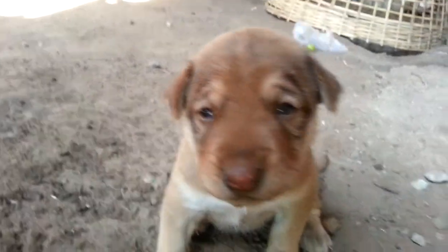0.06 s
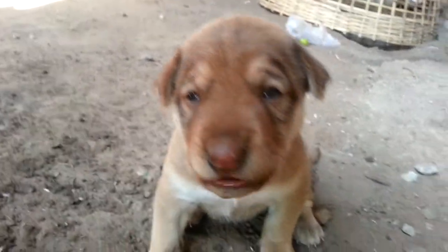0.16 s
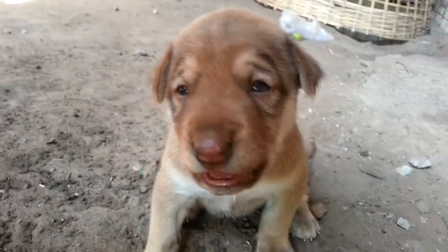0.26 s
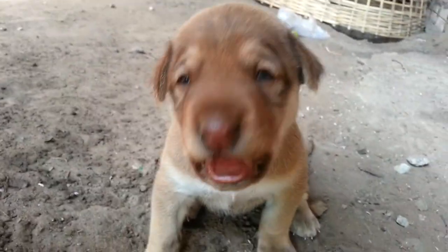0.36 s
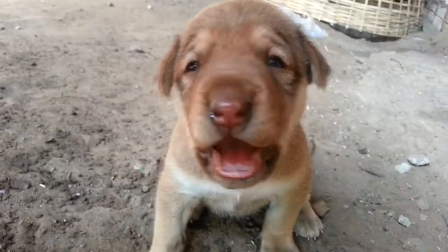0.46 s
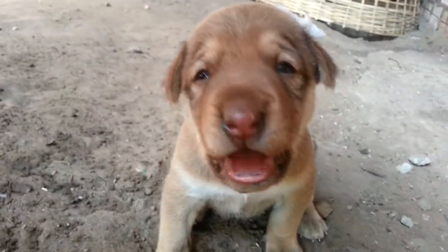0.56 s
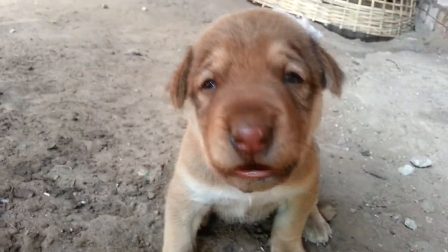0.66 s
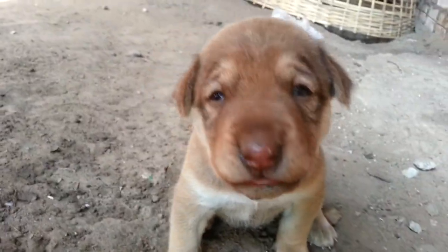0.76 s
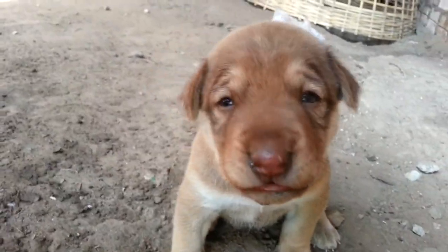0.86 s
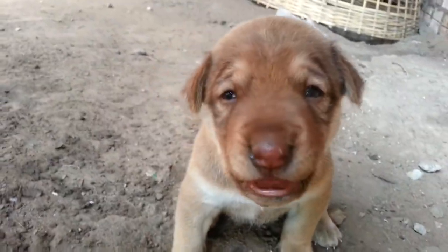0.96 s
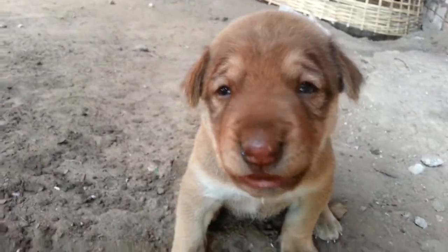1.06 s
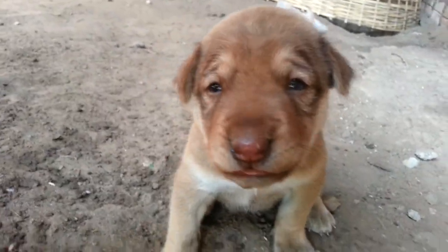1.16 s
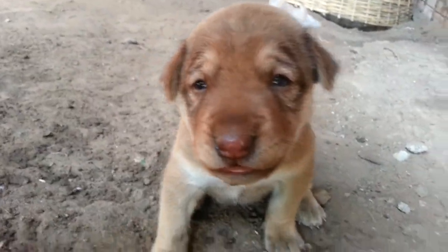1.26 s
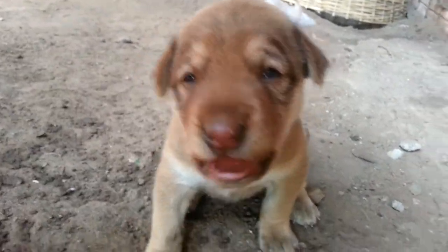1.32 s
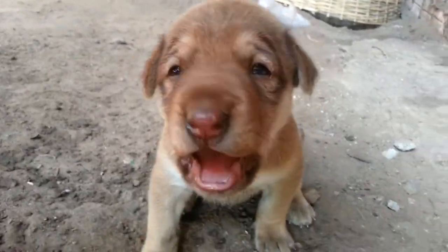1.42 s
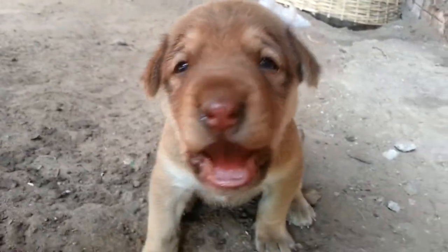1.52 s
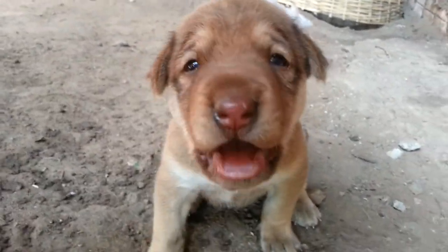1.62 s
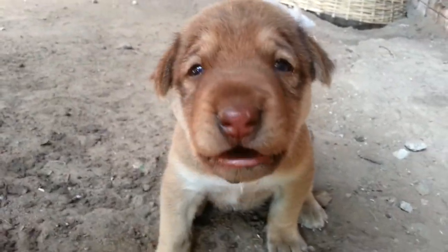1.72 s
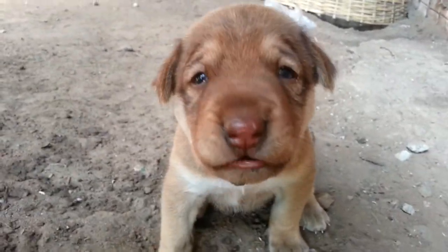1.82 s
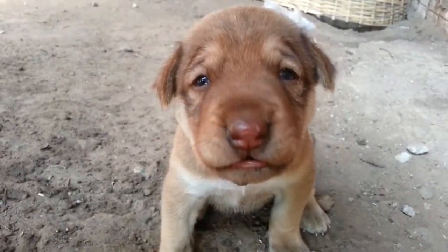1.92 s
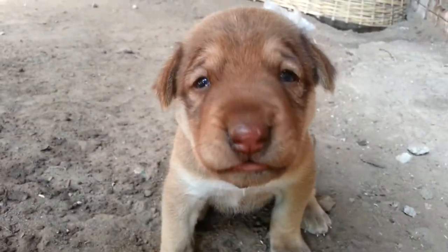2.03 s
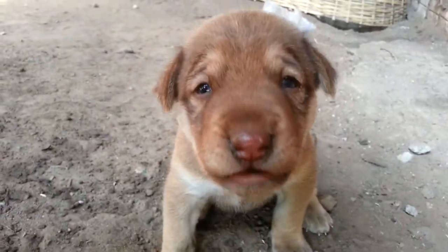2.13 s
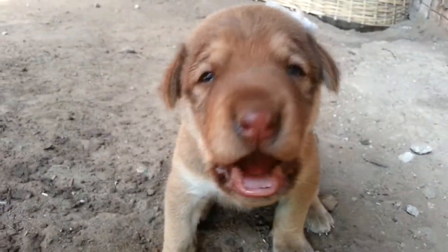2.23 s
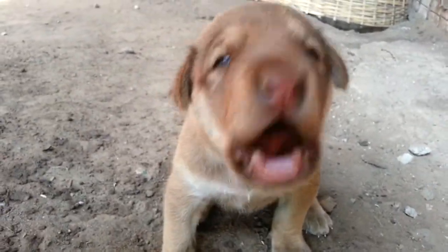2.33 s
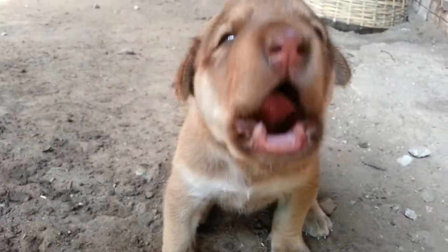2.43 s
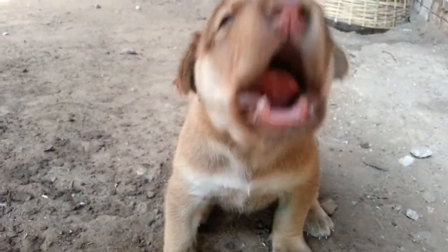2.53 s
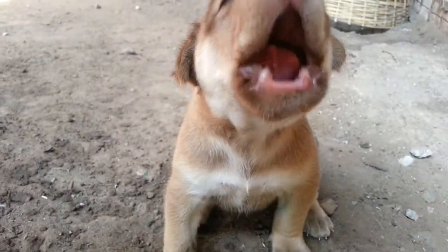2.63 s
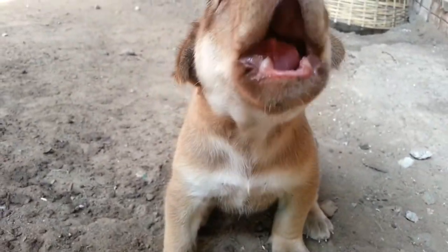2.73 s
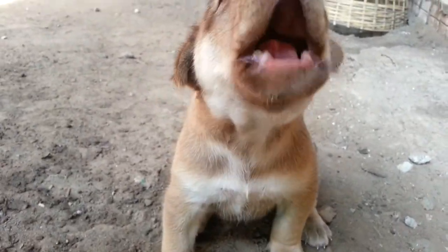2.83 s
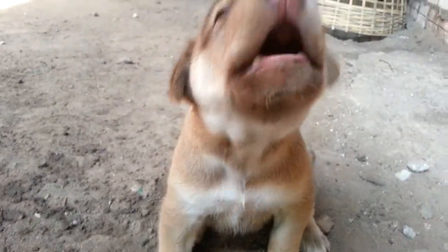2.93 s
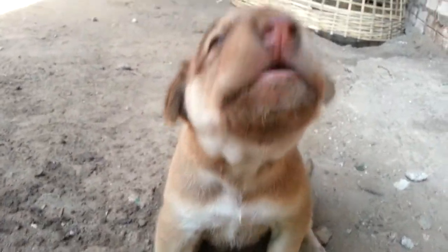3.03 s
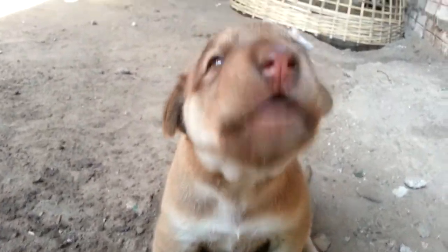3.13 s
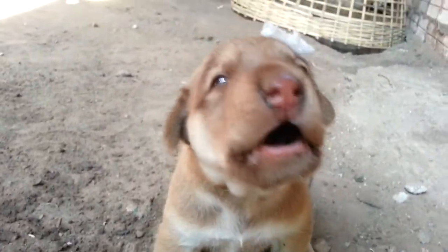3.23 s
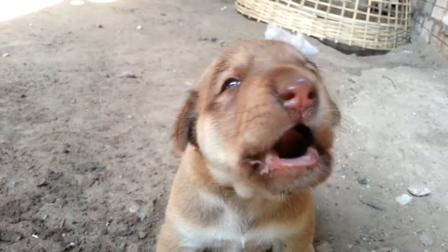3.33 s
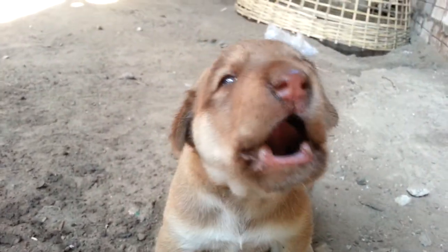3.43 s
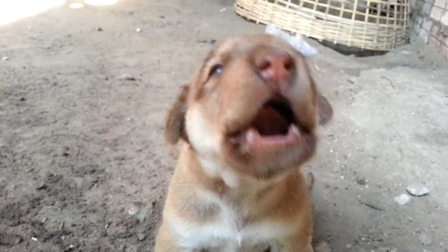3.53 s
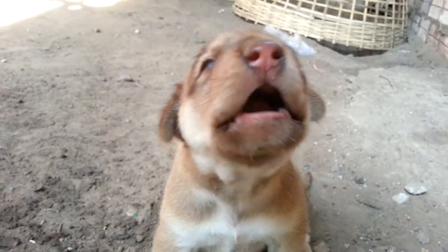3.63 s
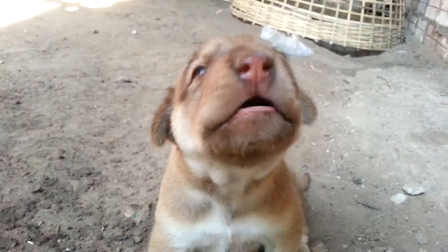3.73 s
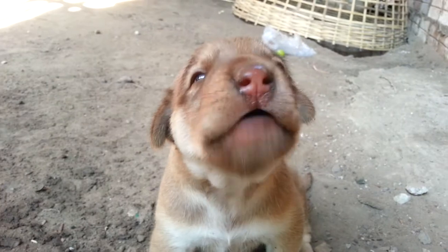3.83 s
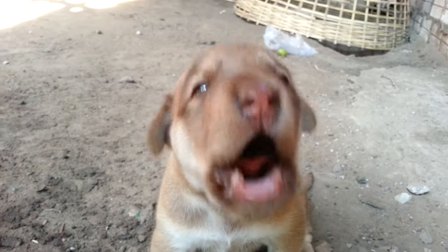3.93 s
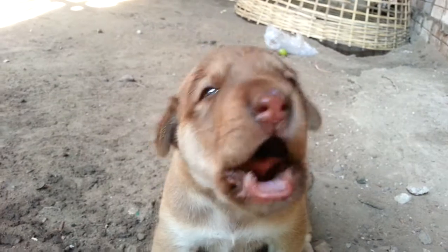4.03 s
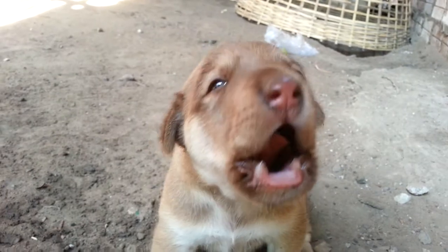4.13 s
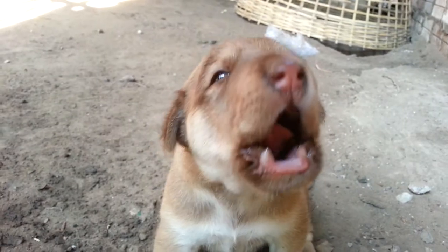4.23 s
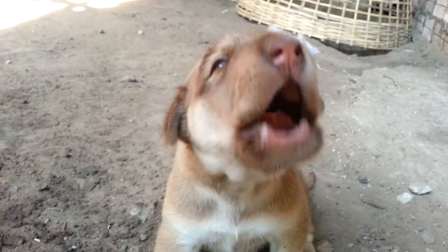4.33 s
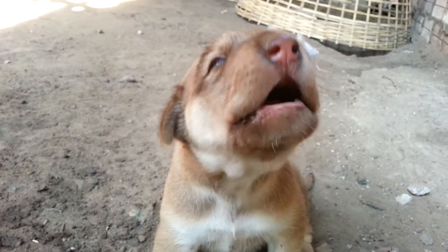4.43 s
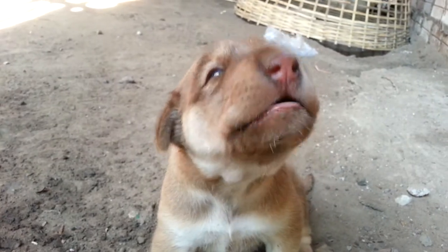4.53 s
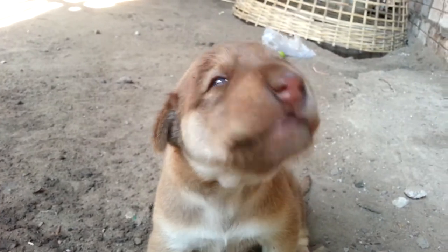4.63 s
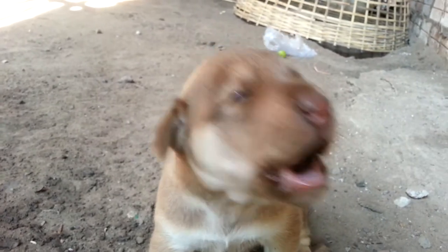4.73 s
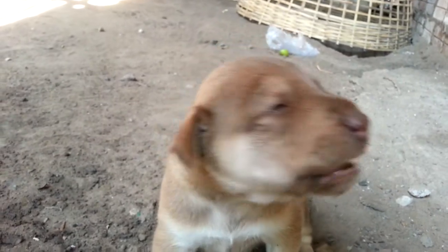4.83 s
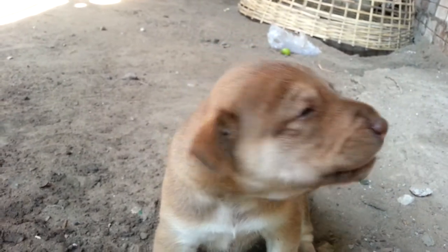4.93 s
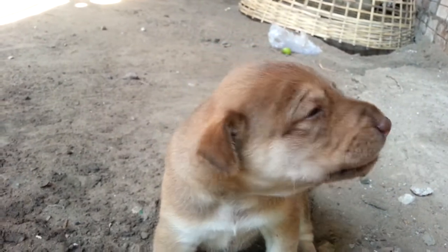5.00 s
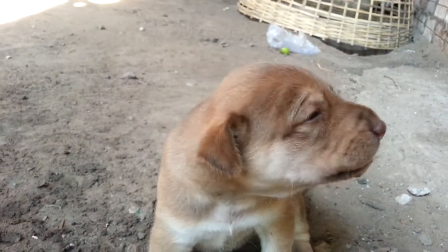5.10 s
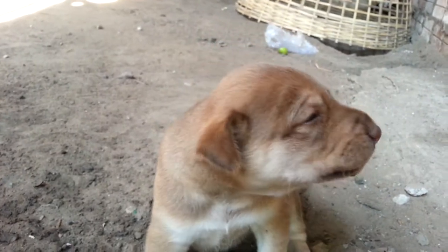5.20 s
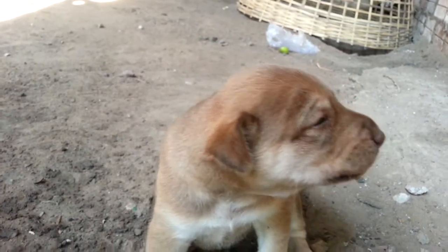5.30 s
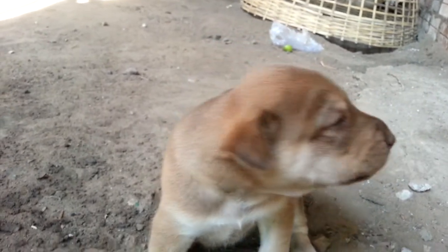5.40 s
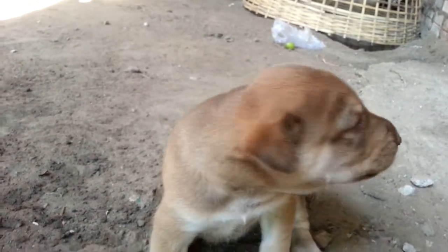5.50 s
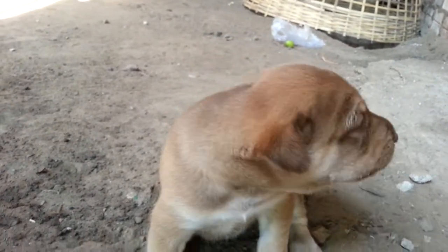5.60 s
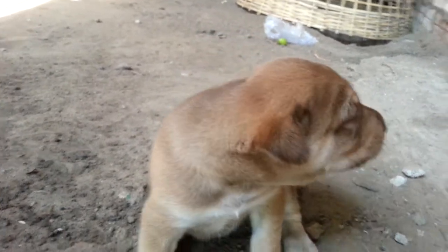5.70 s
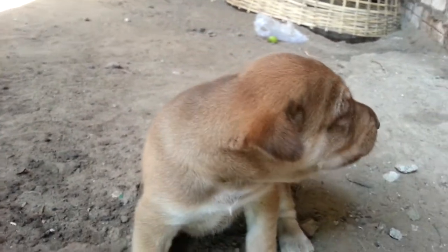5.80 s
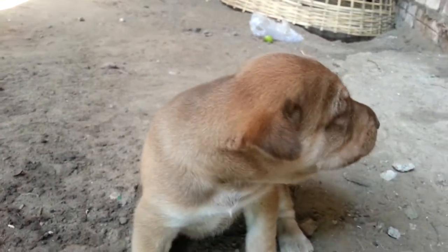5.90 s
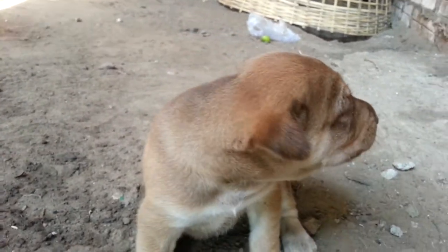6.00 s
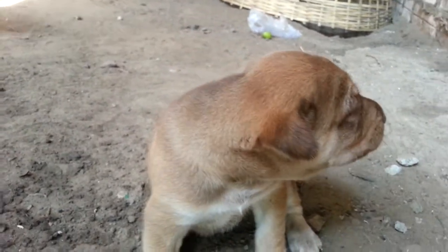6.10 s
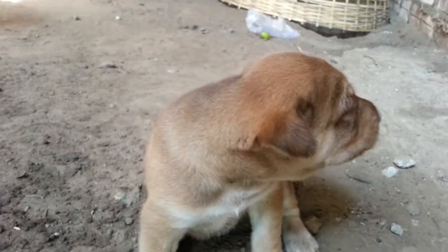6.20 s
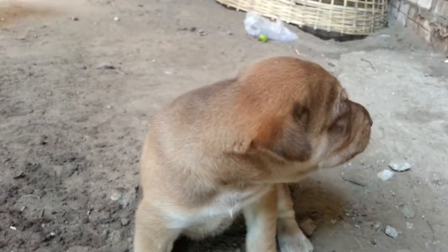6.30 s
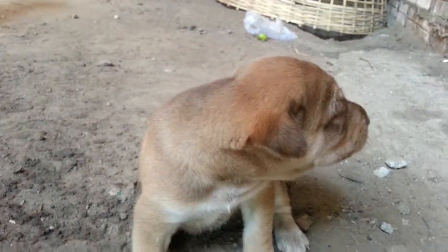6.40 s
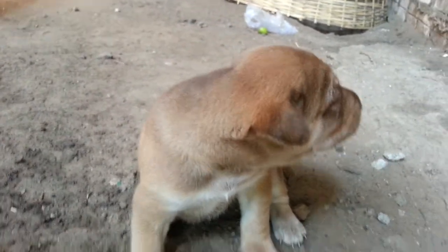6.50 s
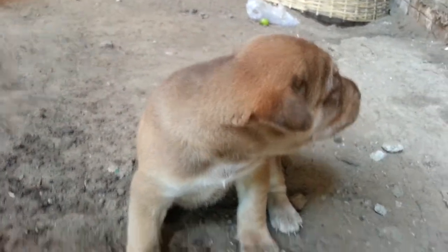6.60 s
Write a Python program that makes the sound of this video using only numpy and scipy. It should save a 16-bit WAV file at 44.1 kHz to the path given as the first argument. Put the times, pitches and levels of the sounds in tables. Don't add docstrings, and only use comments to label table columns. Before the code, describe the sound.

A faint, steady distant wash, like far traffic with thin machine drones, fills a small walled yard. Very close to the stereo microphones, a young puppy begins at 0.2 s with a low whimper that jumps into a trembling wail until 0.7. A short, lower yip follows at 1.0-1.2, then a sharp, high yap at 1.4 that slides down into a rough creak by 1.75. At 2.2 a hard bark leaps up and, after a dip, opens into a clear, piercing howl held until 3.0. A softer, lower wavering whine runs 3.2-3.7. At 3.9 a bright cry falls, then rises into a rounder moan ending near 4.5. The last quick yelp rises and drops at 4.7-5.0. Loud onsets clip slightly; short echoes and faint airy sighs trail each call. Then only hum, a soft dull thud near the microphones at 5.5, and a barely audible one at 6.0.

```python
import sys
import numpy as np
from scipy import signal
from scipy.fft import rfft, irfft
from scipy.io import wavfile
from scipy.ndimage import uniform_filter1d

SR = 44100
rng = np.random.default_rng(int(sys.argv[2]) if len(sys.argv) > 2 else 0)


def amp(db):
    return 10 ** (np.asarray(db, float) / 20)


def write(x):
    x = np.atleast_2d(x).T
    wavfile.write(sys.argv[1], SR, np.round(np.clip(x, -1, 1) * 32767).astype(np.int16))


N = 293294

HEAD_UP_S = 2.44
CALM_RASP = .035


def evened(x, size=0):
    power = uniform_filter1d(x ** 2, size) if size else np.mean(x ** 2)
    return x / np.sqrt(abs(power) + 1e-12)


def read(points, hz):
    f, value = np.transpose(points)
    return np.interp(np.log(hz + 1), np.log(f + 1), value)


def add(mix, s, sound):
    part = mix[..., round(s * SR):][..., :sound.shape[-1]]
    part += sound[..., :part.shape[-1]]


def humps(t, rows):
    at, ms, *heights = np.transpose(rows)
    return heights @ np.exp(-.5 * ((t - at[:, None]) * 1000 / ms[:, None]) ** 2)


def resonate(x, hz, width):
    turn = np.exp(2j * np.pi * np.cumsum(hz * np.ones(len(x))) / SR)
    r = np.exp(-np.pi * width / SR)
    return 2 * (turn * signal.lfilter([1 - r], [1, -r], x / turn)).real


def doubled(x, hz, width):
    return resonate(resonate(x, hz, width), hz, width)


def steep(x, hz, width):
    return evened(doubled(x, hz, width), size=300)


def hum():
    # frequency in Hz, level in dB per Hz
    wash_spectrum = [(18, -45), (30, -52), (151, 2.5), (516, -7), (573, -8), (1350, -5.5), (1460, -3),
                     (1630, -9.5), (2060, 1), (2960, -12.5), (3290, -7), (5840, -23.5), (13800, -22),
                     (15300, -41)]
    # frequency in Hz, likeness of left and right from -1 to 1
    likeness = [(60, 0.78), (180, 0.95), (540, 0.53), (1640, -0.48), (4940, 0.07), (14900, -0.072)]
    # frequency in Hz, left over right in dB
    wash_pan = [(60, -12), (180, 2), (540, 1), (1640, -6), (4940, 7.5), (14900, -2)]
    # frequency in Hz, level in dB rms
    drones = [(1486, -59.5), (1906, -55.5), (2094, -56.5), (3300, -64)]
    frames, hz = N // 256 + 5, np.fft.rfftfreq(1024, 1 / SR)
    a, b, c, d, patches = rng.standard_normal((frames, 513, 5)).T
    patches = uniform_filter1d(patches, size=10, axis=0)
    patches = evened(uniform_filter1d(patches, size=16, axis=1))
    same = np.clip(read(likeness, hz), -1, 1)[:, None]
    left = a + 1j * b
    right = same * left + np.sqrt(1 - same ** 2) * (c + 1j * d)
    z = np.array([left, right]) * amp(read(wash_spectrum, hz)[:, None] + 0.19 * patches)
    z *= amp(np.multiply.outer([.5, -.5], read(wash_pan, hz)))[..., None]
    wash = amp(-44.5) * evened(signal.istft(z, nperseg=1024, noverlap=768)[1][:, :N])
    noise = rng.standard_normal((len(drones), N))
    return wash + sum(amp(db) * evened(doubled(n, f, 14)) for n, (f, db) in zip(noise, drones))


def wavers(t):
    # first crest in seconds, length in seconds, rate in Hz, pitch depth in %
    trembles = [
        (0.58, 0.11, 22.1, 4.6),
        (1.458, 0.17, 23.38, 5.1),
        (2.361, 0.076, 24.9, 7),
        (3.412, 0.27, 20.8, 1.75),
        (4.051, 0.092, 21.55, 1.8),
        (4.23, 0.056, 21.1, 2.3),
    ]
    # time in seconds, width in ms, pitch in %, level in dB
    catches = [(0.217, 2.5, -3.5, -4), (.379, 2, 1.5, -6.5), (0.43, 8.2, 0, -4), (0.506, 7.4, 18, -2),
               (0.56, 5, -2.5, -6), (0.69, 4.9, -2, 4), (1.011, 4.4, 1.2, 0.5), (1.162, 2.6, -0.9, 1),
               (1.402, 2.4, -2.5, -12), (1.424, 2.5, 3, -6.5), (1.443, 3, -3.5, -2), (1.509, 2.54, 0.1, -1),
               (1.5172, 4.1, -2, 7), (1.673, 3.9, -5.5, -7), (1.731, 3.9, -4, -5.5), (2.34, 6, 0.5, -4.5),
               (2.346, 4.45, -4, 4), (2.3792, 5.3, 0.5, 8), (2.434, 0.93, 0, -7), (2.4412, 5, 3.5, -0.5),
               (2.467, 4.6, 1, -9), (2.2, 4.4, 0, -3.5), (2.8, 4, 1.4, -1.5), (3.32, 8.7, 0, -4.5),
               (3.388, 4.6, -2.4, 0.5), (3.46, 4.2, 2, 1), (3.488, 5.9, -1, 1.5), (3.62, 6, -.5, 1),
               (3.708, 3.6, -4, -2), (4.06, 3.9, -2.5, -1), (4.103, 4.2, 0, -0.5), (4.16, 6, -1.5, -3.5),
               (4.267, 6.2, -3.5, -0.5), (4.739, 2.8, 8.5, 2.5), (4.787, 5, 6.5, -3.5),
               (4.811, 6, 3.5, -2.5), (4.865, 4.5, 1.3, 4.5), (5.4, 7.8, -0.5, 2), (4.964, 3.5, 3.5, 3.5)]
    crest, length, rate, depth = np.transpose(trembles)
    since = t[:, None] - crest
    hold = np.clip(np.minimum(since * rate * 4 + 1, (length - since) * rate * 4), 0, 1)
    swing = 2 * np.pi * rate * since
    tremble = (hold * (np.cos(swing) - 0.056 * np.cos(2 * swing))) @ depth
    percent, swell_db = humps(t, catches)
    return tremble + percent, 0.24 * tremble + swell_db


def folds(t, end_s, hz):
    # start in seconds, end in seconds, rasp 0-1, strong-weak share 0-1
    breaks = [(.348, .39, .07, .1), (.39, .46, .1, .1), (.545, .682, .06, 0), (.682, .7, .22, .1),
              (.7, .75, .85, 0), (.97, .995, .36, .2), (.995, 1.05, .065, 0), (1.155, 1.18, .2, 0),
              (1.37, 1.398, .1, 1), (1.398, 1.424, .15, 1), (1.424, 1.465, .14, .3),
              (1.636, 1.664, .36, .8), (1.677, 1.7, .3, .42), (1.7, 1.738, .42, .45), (2.22, 2.25, .07, .3),
              (2.262, 2.285, .3, .35), (2.285, 2.325, .065, .2), (2.466, 2.53, .035, .02),
              (2.63, 2.955, .03, 0), (2.961, 2.966, .3, 0), (3.963, 4.017, .3, .4), (4.78, 4.812, .13, .12),
              (4.812, 4.96, .075, .06), (4.96, 4.98, .2, 0)]
    slip_s, ending_s, end_rasp = .006, .012, .25
    a, b, rasp, uneven = np.transpose(breaks)
    inside = np.clip(np.minimum(t[:, None] - a, b - t[:, None]) / slip_s + .5, 0, 1)
    ending = end_rasp * np.clip((t - end_s + ending_s) / slip_s, 0, 2)
    ending = ending * np.minimum(550 / hz, 1) ** 2
    calm = CALM_RASP * 550 / hz
    return np.maximum(np.maximum(inside @ rasp, calm), ending), inside @ uneven


def fold_pulses(t, hz, rasp, uneven, creak):
    shake = evened(uniform_filter1d(rng.standard_normal(len(t)), size=60))
    jumps = rng.standard_normal(200)[((t - t[0]) * 1000 / 4).astype(int)]
    jolt = .13 * np.clip(rasp - .06, 0, .25) * uniform_filter1d(jumps, size=40)
    jitter = (0.00021 + 0.11 * np.maximum(rasp - .025, 0)) * shake
    turns = np.cumsum(hz * (1 + jolt + jitter)) / SR
    coarse = np.arange(t[0], t[-1] + .03, .03)
    flicker = rng.standard_normal((len(coarse), 41)).T

    def partial(k):
        level = amp(4.5 * np.tanh(k / 7) * np.interp(t, coarse, flicker[k]))
        return level * (k * hz < 15000) * np.cos(2 * np.pi * k * turns)

    pulses = evened(sum(partial(k) for k in range(1, 41)), size=400)
    cycle = np.round(turns).astype(int)
    skipped = 1 - creak * (rng.random(cycle[-1] + 1) < .1)[cycle]
    every_third = creak * (t > 1.672)
    pattern = np.where(every_third, 2 * np.cos(2 * np.pi * turns / 3), np.cos(np.pi * turns))
    beats = pulses * (1 + uneven * pattern) * skipped
    puffs = (.5 + np.exp(-(turns % 1) / 0.35)) * rng.standard_normal(len(t))
    return pulses, beats, puffs


def mouth_shape(t, hz, strain):
    # from in seconds, tongue place factor, tongue ring in dB, upper rings in dB,
    # topmost rings in dB, upper ring place factor
    poses = [(0, 1.104, 2.5, -9.5, 3.5, 1.02), (.39, 1.14, -0.5, -12.5, -1.5, 1.03),
             (.555, 1.045, 9, 1.5, 6, 0.99), (.9, 1.064, 5.5, 3, 9.5, 0.97),
             (1.301, 0.98, 4.5, -9, 5.5, 1.02), (1.63, 1.005, 3, -1, -8, 0.95),
             (2.1, 1.12, -3.5, -2, 1, 1.01), (2.466, 0.92, 6.5, 6, -4.5, 0.92),
             (2.57, 0.94, 9, 7, 3.5, 0.95), (2.67, 0.95, 10, 9.5, 17.5, 1.03),
             (2.951, 1.05, 10, -4.5, 5, .99), (3.1, 1.07, -1.5, -3.5, -12.5, 1.05),
             (3.4, 0.98, 1.5, -0.5, -3, 1.01), (3.56, 0.93, -2.5, -0.5, 4, 0.94),
             (3.8, 1.035, 1, -3.5, -3, 1.07), (4.08, 1.17, -5.5, 1.5, -5, 0.98),
             (4.19, 1.05, -2, -3, -0.5, 1.03), (4.37, 0.97, -7, -1, 1.5, 0.92),
             (4.6, 1.105, -0.5, -4.5, -3, 1.06)]
    # time in seconds, width in ms, mouth ring in dB,
    # tongue and upper rings in dB
    flares = [(.24, 6.8, 3.5, 6), (.27, 25, -7.5, 0.5), (0.388, 12, 0.5, 0), (.42, 5.9, 5.5, 1),
              (.442, 5.6, 8, 1), (.53, 12, 3, 0), (.63, 25, -1.5, -3.5), (1.03, 27, 3, -6.5),
              (1.11, 31, -21, -2), (1.405, 5.5, 8, -3), (1.433, 6, 8, -6.5), (1.489, 21, -1.5, 9.5),
              (1.546, 11, -11, 5.5), (1.59, 15, -12, 0), (2.276, 6.8, 5.5, 1.5), (2.311, 12, -5, -6.5),
              (2.36, 9.4, 13, 1.5), (2.45, 12.5, -12.5, 2), (3.28, 20, -0.5, -2), (3.45, 45, -0.5, -10),
              (3.631, 29, 1.5, 1.5), (4.029, 12, 4, -3), (4.191, 10, 0, 8), (4.211, 4.3, 2, 7.5),
              (4.327, 6, -9, 14.5), (4.44, 10, 6, 8.5), (4.775, 10, 1, 5), (4.836, 6.7, 5.5, 5.5),
              (4.875, 9.9, 9, -0.5), (4.93, 25, -6.5, 0)]
    pose = np.transpose(poses)
    held = pose[1:, np.searchsorted(pose[0], t) - 1]
    place, tip_db, shine_db, top_db, lift = uniform_filter1d(held, size=400)
    wide_db, glint_db = humps(t, flares)
    mouth_db = -38.5 + 42.04 * strain + wide_db
    tongue_db = -34.5 + 24.7 * strain + tip_db + glint_db
    upper_db = -37 + 24.1 * strain + shine_db + 3.5 * np.log2(hz / 700) + 0.89 * glint_db
    return mouth_db, tongue_db, upper_db, place, top_db, lift


def upper_rings(t, drive, top_db, lift):
    # frequency in Hz, width in Hz, level in dB
    upper = [(7100, 1300, 0.5), (11700, 1200, -9), (13000, 900, -17)]
    tilt = np.interp(t, [HEAD_UP_S, HEAD_UP_S + 0.053], [0.817, 1])
    total = 0
    for k, (f, width, db) in enumerate(upper):
        topmost = k > 0
        ring = doubled(drive, f * (tilt if topmost else lift), width)
        total = total + (-1) ** k * amp(db + top_db * topmost) * ring
    return evened(total, size=300)


def clear_below(x, edge_hz):
    hz, t, z = signal.stft(x, SR, nperseg=512)
    edge = np.interp(t, np.arange(len(x)) / SR, edge_hz)
    cut = amp(-15.5 * np.clip(3 - 3 * hz[:, None] / edge, 0, 1))
    return signal.istft(z * cut, SR, nperseg=512)[1][:len(x)]


def yelp(rows):
    # time in seconds, creak 0-1
    creaks = [(1.632, 0), (1.64, .5), (1.662, .5), (1.667, .1), (1.674, .1), (1.68, .6), (1.735, .8),
              (1.745, .3), (1.79, 0)]
    # frequency in Hz, width in Hz
    slack_rings = [(1000, 600), (1650, 450), (2350, 650)]
    # time in seconds, width in ms, level in dB
    nasal = [(.21, 10, -5.5), (0.328, 25, 14), (.45, 24, -16.5), (.6, 24, 2.5), (0.704, 18, 10.5),
             (0.998, 19, 6.5), (1.16, 18, 11), (1.5, 40, -1.5), (1.75, 10, 10), (2.3, 30, 1.5),
             (2.41, 30, -12), (3.232, 19, 9.5), (3.5, 82, -3), (3.72, 17, 9), (4.0, 30, 6), (4.16, 110, -3),
             (4.471, 16, 8.5), (4.8, 25, 0.5), (4.93, 25, 6)]
    # time in seconds, width in ms, shift in %
    grins = [(.25, 23, 7.5), (0.378, 12, 11.5), (0.476, 20, 21), (.64, 47, -8), (1.03, 30, 30),
             (1.432, 14, 13.5), (1.465, 15, 13.5), (2.268, 8.7, 9.5), (2.315, 20, 23), (2.36, 8.9, 11),
             (3.27, 33, 4), (4.0, 25, 9), (4.3, 41, 9), (4.84, 28, 8.5)]
    release_s, release_db = 0.018, -55.5
    s, hz, *columns = np.transpose(rows)
    t = np.arange(s[0], s[-1] + release_s, 1 / SR)
    effort_db, opening, strain = (np.interp(t, s, c) for c in columns)
    percent, swell_db = wavers(t)
    glide = uniform_filter1d(np.interp(t, s, np.log(hz)), size=200, mode="nearest")
    hz = np.exp(glide + percent / 100)
    effort_db = effort_db + swell_db + release_db * np.maximum(t - s[-1], 0) / release_s
    mouth_db, tongue_db, upper_db, place, top_db, lift = mouth_shape(t, hz, strain)
    rasp, uneven = folds(t, s[-1], hz)
    creak = np.interp(t, *np.transpose(creaks))
    pulses, beats, puffs = fold_pulses(t, hz, rasp, uneven, creak)
    breath = evened(signal.lfilter(*signal.butter(2, 900, "high", fs=SR), puffs))
    hiss = evened(puffs)

    drive = (1 - rasp) * beats + 0.5 * rasp * breath
    slack = sum((-1) ** k * doubled(drive, *ring) for k, ring in enumerate(slack_rings))
    throat = (1 - creak) * steep(drive, 1600 * opening, 420) + creak * evened(slack, size=900)
    nose = amp(-16.5 + humps(t, nasal)[0]) * steep(pulses, 857, 824)
    voice = signal.lfilter(*signal.butter(3, 2900, fs=SR), throat - nose)

    grain = (250 / hz) ** 2 * np.interp(t, [HEAD_UP_S, HEAD_UP_S + .04], [.8, .1])
    drive = drive - .45 * np.minimum(rasp, CALM_RASP) * breath + grain * hiss
    follow = 0.892 + 0.032 * (opening - 1)
    mouth_hz = 3100 * follow * (1 + humps(t, grins)[0] / 100)
    voice -= amp(mouth_db - 100.0 * creak) * steep(drive, mouth_hz, 480)
    voice += amp(tongue_db) * steep(drive, 4750 * follow * place, 600)
    drive = drive + np.interp(t, [HEAD_UP_S, HEAD_UP_S + .04], [.3, 0]) * hiss
    voice -= amp(upper_db) * upper_rings(t, drive, top_db, lift)

    voice = signal.lfilter(*signal.butter(2, 260, "high", fs=SR), voice)
    voice = clear_below(voice, .75 * hz / (1 + np.minimum(4 * uneven, 1) + 3 * creak))
    fade = np.minimum(np.minimum(t - t[0], t[-1] - t) / 0.0039, 1)
    return amp(effort_db - 2.5) * voice * fade


def ports(x):
    # frequency in Hz, left over right in dB
    port_db = [(60, 29.5), (150, 33), (380, -5), (950, -2), (2370, -10), (5940, 9), (14900, 7)]
    # frequency in Hz, lead of the left in radians
    port_turn = [(0, -1.9), (3450, 0.97), (13000, -1.18), (14600, -1.4), (15100, 0.4)]
    hz = np.fft.rfftfreq(N, 1 / SR)
    half = amp(read(port_db, hz) / 2) * np.exp(.5j * read(port_turn, hz))
    return irfft(rfft(x) * np.array([half, 1 / half]), N)


def yard(x):
    # frequency in Hz, time to fall 60 dB in seconds
    yard_t60 = [(400, 0.29), (1500, 0.14), (4000, 0.29), (9000, 0.34)]
    taps = np.zeros((2, SR))
    at = np.arange(500, SR - 20, 20) + rng.integers(0, 20, (2, (SR - 501) // 20))
    np.put_along_axis(taps, at, rng.choice([-1., 1.], at.shape), 1)
    hz, t, z = signal.stft(taps, SR, nperseg=256)
    decay = amp(-60 * t / read(yard_t60, hz)[:, None])
    tail = signal.istft(z * decay, SR, nperseg=256)[1]
    return signal.fftconvolve(x[None], tail / np.linalg.norm(tail[0]), axes=1)[:, :N]


def ducking(x):
    power_db = 10 * np.log10(abs(uniform_filter1d((x ** 2).mean(0), size=900)) + 1e-9)
    return amp(-.55 * np.clip(power_db + 21.5, 0, None))


def gate(x):
    # time in seconds, width in ms, level in dB
    gates = [
        (.51, 27.4, -23),
        (1.55, 36, -13),
        (2.43, 27, -21),
        (2.6, 79, -9.5),
        (3.38, 53, -2),
        (4.12, 39, -8),
        (4.3, 65, -11),
    ]
    low = signal.sosfiltfilt(signal.butter(6, 600, fs=SR, output="sos"), x)
    gate_db = np.repeat(humps(np.arange(0, N, 64) / SR, gates)[0], 64)[:N]
    return x - low * (1 - amp(gate_db))


def sigh(db):
    t = np.arange(0, .3, 1 / SR)
    air = evened(doubled(rng.standard_normal(len(t)), 1650, 450))
    return amp(db - 60 * t / 0.65) * air * np.minimum(t / .01, 1)


def thud():
    # frequency in Hz, level in dB, time to fall 60 dB in seconds
    thud_modes = [(283, -0.5, 0.11), (548, 5, 0.028), (745, 3.5, 0.028)]
    t = np.arange(0, .04, 1 / SR)
    rings = sum(amp(db - 60 * t / t60) * np.sin(2 * np.pi * f * t) for f, db, t60 in thud_modes)
    return rings * np.sin(np.pi * t / t[-1])


def scene():
    # time in seconds, pitch in Hz, effort in dB,
    # mouth opening as a factor on the throat, strain 0-1
    whimper = [(.195, 326.2, -22, 0.46, 0), (.21, 403, -16.5, 0.37, 0), (.221, 488.7, -7, 0.73, 0.55),
               (.27, 534, -2.5, 0.98, 0.5), (.284, 531.4, -12, 0.99, 0.46), (.3, 483, -16, 0.71, 0),
               (.332, 382.3, -14, 1.1, 0), (.345, 408, -18, 1, 0.3), (.352, 415, -7.5, 1.2, 0.3),
               (.368, 408.5, -10.5, 1.04, 0.67)]
    wail = [(0.406, 519, -2, 1.005, 0.78), (.428, 645, -3.5, 1.055, 0.8), (0.451, 820, -2, 1.03, 0.67),
            (0.491, 862, -7.5, 1.29, 0.69), (0.545, 834, -9, 1.184, 0.52), (0.564, 613.4, -12.5, 1, 0.3),
            (0.606, 548, -10.5, 1.08, 0.22), (.65, 548, -10.5, 1.124, 0.22), (0.693, 545, -14, 1.1, 0.26),
            (0.703, 548, -28.5, 1.67, 0.43), (0.721, 539, -22.5, 1.09, 0.65)]
    yip = [(0.983, 405, -11.5, 0.97, 0.14), (1.0, 463.5, -11.5, 0.9, 0.57), (1.025, 529.5, 1, 1.05, 0.25),
           (1.033, 566.5, -4.5, 1.08, 0.39), (1.041, 598.4, -7.5, 1.07, 0.58),
           (1.064, 625, -10, 0.97, 0.46), (1.11, 563, -7, 1.07, 0.17), (1.145, 467.5, -12.5, 0.98, 0.13),
           (1.169, 444.4, -15, 1.23, 0.5)]
    yap = [(1.377, 584, -13, 0.92, 0.19), (1.386, 685, -6.5, 0.78, 0.46), (1.396, 807, 3, 0.96, 0.59),
           (1.412, 1009, 10.5, 0.96, 0.65), (1.428, 1118, -0.5, 0.98, 0.8), (1.441, 1128, -1, 1.06, 0.87),
           (1.455, 1222, -0.5, 1.33, 0.68), (1.469, 1162, -5, 1.11, 0.75), (1.521, 952, -11, 1.12, 0.3),
           (1.569, 858, -10.5, 1.15, 0.3), (1.64, 805, -10, 1.214, 0.45), (1.679, 742, -7.5, 1.04, 0.18),
           (1.726, 617, -16.5, 0.63, 0.38), (1.739, 558.4, -8, 0.87, 0.19), (1.752, 695, -13.5, 1.14, 0.14)]
    bark = [(2.229, 460.5, -11.5, 0.9, 0.65), (2.25, 685.5, 5.5, 0.92, 0.73), (2.26, 798.6, -2, 1.05, 0.84),
            (2.271, 1119, 0, 0.9, 0.89), (2.287, 1236, 1.5, 1.28, 0.72), (2.327, 1249, -2, 1.254, 0.67),
            (2.345, 1110, -8.5, 1.07, 0.73), (2.385, 862, -11, 1.25, 0.16), (2.426, 858, -4.5, 1.11, 0.063),
            (2.44, 971, -5.5, 1.18, 0.22), (2.463, 1031, -3.5, 1.05, 0.56)]
    howl = [(2.473, 1305, -3, 0.99, 0.12), (2.514, 1315, -4.5, 0.92, 0.17), (2.569, 1235, -8, 1.03, 0.24),
            (2.604, 1254, -7, 1.09, 0.085), (2.679, 1137, -8, 1.025, 0.26),
            (2.771, 1146, -7.5, 1.004, 0.11), (2.863, 1156, -8.5, 1.073, 0.25),
            (2.893, 1173, -9.5, 1.023, 0.25), (2.94, 1130, -13.5, 1.045, 0.26),
            (2.961, 1153, -22, 0.97, 0.25), (2.968, 1010, -13, 0.91, 0.1), (2.972, 1070, -12, 0.98, 0.16),
            (2.98, 925, -18, 0.99, 0.082)]
    whine = [(3.209, 338.4, -23, 0.24, 0.1), (3.227, 512, -14, 0.81, 0.49), (3.256, 587.7, -1, 0.89, 0.73),
             (3.299, 612.6, -6.5, 0.98, 0.71), (3.358, 470, -8.5, 0.84, 0.55),
             (3.401, 475, -7.5, 0.93, 0.52), (3.55, 538.4, -7.5, 0.92, 0.23),
             (3.67, 517.5, -7, 0.88, 0.075), (3.715, 533, -9.5, 0.94, 0.039)]
    cry = [(3.925, 332, -15.5, 0.37, 0.071), (3.944, 563.5, 0, 0.87, 0.43), (3.966, 1010, 2, 1.1, 0.9),
           (4.0, 1093, 2, 1.312, 0.72), (4.048, 932, -1.5, 1.19, 0.28), (4.073, 747, -11, 1.06, 0.11),
           (4.167, 588, -5.5, 1.04, 0.036)]
    moan = [(4.209, 620, -7.5, 1.015, 0.021), (4.289, 787, -4.5, 0.88, 0.048),
            (4.353, 823.3, -7.5, 0.96, 0), (4.401, 805, -9, 0.95, 0), (4.428, 738, -6.5, 0.92, 0),
            (4.46, 714.5, -14, 0.96, 0.0046), (4.482, 616, -12, 1.08, 0.023)]
    last_yelp = [(4.732, 310, -27, 0.36, 0.065), (4.75, 478, -8, 0.68, 0.45), (4.768, 653, 2, 0.94, 0.49),
                 (4.783, 847, 0, 1.21, 0.92), (4.793, 946, 2, 1.26, 0.92), (4.81, 886, -1, 1.19, 0.81),
                 (4.845, 753, -7, 1.085, 0.58), (4.876, 586, -13, 1.05, 0.37),
                 (4.9, 492, -8.5, 0.99, 0.073), (4.958, 423, -17, 0.85, 0.039),
                 (4.975, 381, -16.5, 0.97, 0.074)]
    sigh_levels = [-40, -36, -40, -36, -34, -33, -39]
    # time in seconds, peak in dB
    thud_times = [
        (5.476, -25),
        (5.998, -54),
    ]
    background = hum()
    puppy, thuds = np.zeros((2, N)), np.zeros(N)
    calls = [whimper + wail, yip, yap, bark + howl, whine, cry + moan, last_yelp]
    for rows, sigh_db in zip(calls, sigh_levels):
        add(puppy, rows[0][0], yelp(rows))
        add(puppy, rows[-1][0], sigh(sigh_db))
    for s, db in thud_times:
        add(thuds, s - .008, amp(db) * thud())
    deep = signal.sosfiltfilt(signal.butter(2, 900, fs=SR, output="sos"), background)
    background = background - deep * (1 - ducking(puppy))
    return ports(puppy) + amp(-10.5) * yard(puppy.mean(0)) + background + thuds


def roll_off(x):
    return signal.sosfilt(signal.butter(12, 15490, fs=SR, output="sos"), x)


def record(dry):
    sag = signal.lfilter(*signal.butter(1, 70, fs=SR), np.maximum(abs(dry) - .75, 0))
    clipped = np.clip(dry - 0.056 * sag, -1.0, .97)
    return roll_off(gate(clipped))


dry = scene()
out = record(dry)
write(out)
```